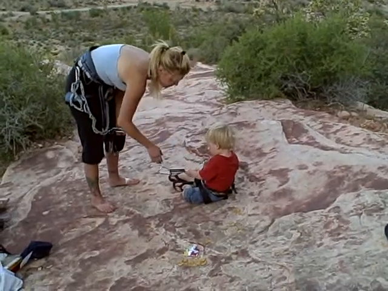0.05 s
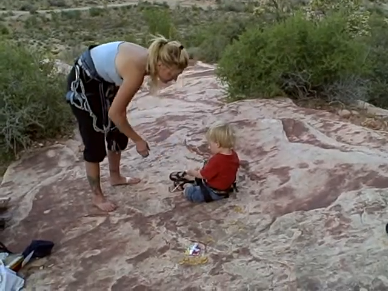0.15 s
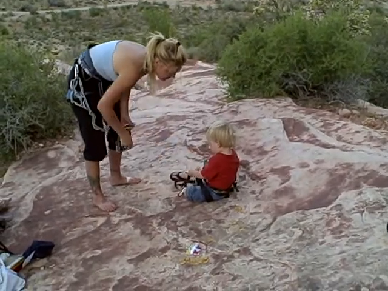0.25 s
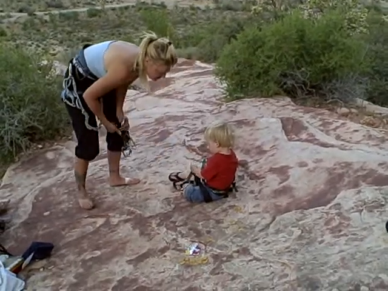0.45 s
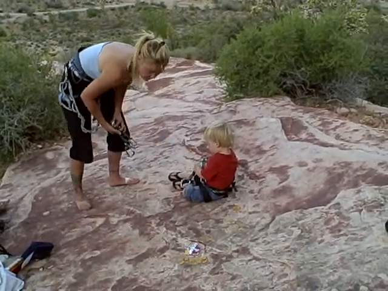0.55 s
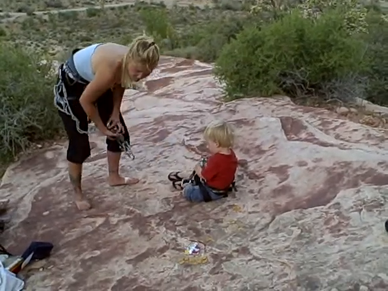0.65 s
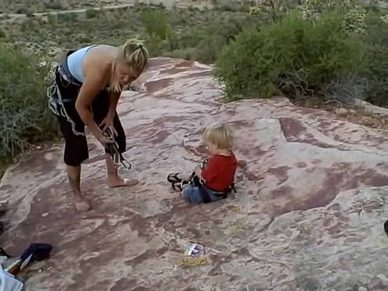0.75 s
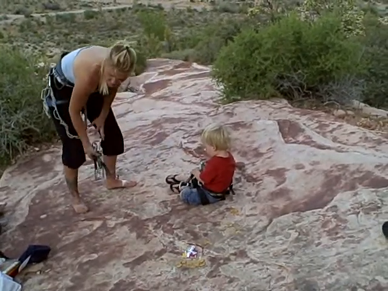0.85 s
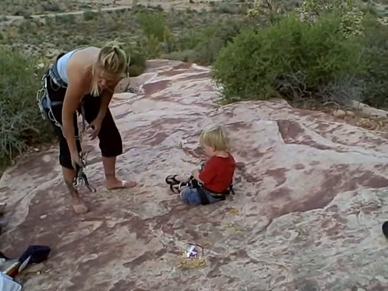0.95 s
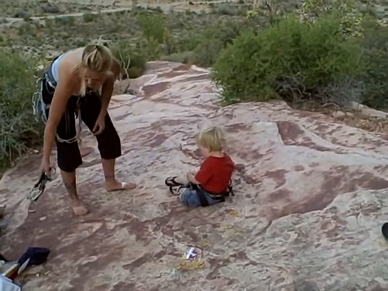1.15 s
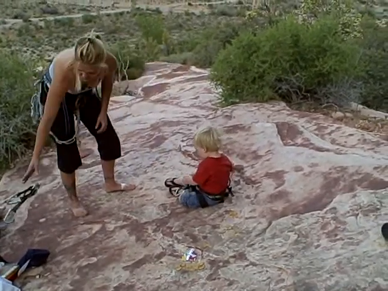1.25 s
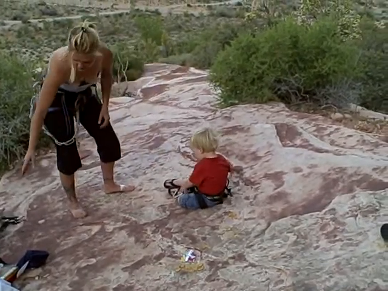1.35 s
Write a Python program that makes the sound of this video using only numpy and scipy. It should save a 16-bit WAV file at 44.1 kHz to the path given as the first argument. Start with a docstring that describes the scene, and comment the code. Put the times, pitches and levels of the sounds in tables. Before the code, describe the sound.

A carabiner snaps shut with a bright, dry click, followed after a pause by clusters of small metallic clinks and scrapes; outdoors, light wind, low hum and faint echo, a small microphone some metres away.

```python
"""Climbing carabiners handled on an open rock slab, a few metres from a small camera.
Throughout: light wind and hiss (shaped noise) and a low wavering hum (drifting sine).
After a first faint knock a sprung gate snaps shut: two modal blows plus decaying noise, damped as it seats.
Then the gathered pieces knock, rattle and slide: ticks, decaying modes cut short by the hand, grainy noise.
Rock and bushes return a faint echo of the gear: a decaying noise tail."""
import sys
import numpy as np
from scipy import signal
from scipy.fft import rfft, irfft
from scipy.io import wavfile
from scipy.ndimage import uniform_filter1d

SR = 44100
rng = np.random.default_rng(int(sys.argv[2]) if len(sys.argv) > 2 else 0)


def store_wav(level_fs):
    """Save 16-bit WAV to argv[1]."""
    pcm = np.round(np.clip(np.atleast_2d(level_fs), -1, 1) * 32767)
    wavfile.write(sys.argv[1], SR, pcm.T.astype(np.int16))


N = 61739  # samples
SNAP_S = 0.22163  # gate meets nose


def undb(db):
    """Decibels to amplitude gain."""
    return 10 ** (np.asarray(db) / 20)


def level(x, rms_db):
    """Scale to an rms level."""
    return x * undb(rms_db) / np.sqrt(np.mean(x ** 2))


def gains(points, size):
    """Gain per transform bin, dB interpolated over log frequency; points are f/Hz, level/dB."""
    f_hz, level_db = np.array(points, float).T
    bin_hz = np.arange(size // 2 + 1) * SR / size
    return undb(np.interp(np.log(bin_hz + 1), np.log(f_hz), level_db))


def colour(x, points, size=1024):
    """Minimum-phase filter via the folded cepstrum; its impulse response has unit peak."""
    cepstrum = irfft(np.log(gains(points, size)))
    cepstrum[1:size // 2] *= 2
    cepstrum[size // 2 + 1:] = 0
    response = irfft(np.exp(rfft(cepstrum)))
    return signal.fftconvolve(x, response / np.abs(response).max())[:N]


def noise(points):
    """Steady Gaussian noise shaped to a spectrum."""
    return irfft(rfft(rng.standard_normal(N)) * gains(points, N), N)


def walk(rate_hz):
    """Slow random drift, spread near 1: held random values, smoothed."""
    hold = int(SR / rate_hz)
    steps = np.repeat(rng.standard_normal(N // hold + 1), hold)
    return uniform_filter1d(steps, hold)[:N]


def since(start_s):
    """Seconds since a moment, zero before it."""
    return np.maximum(np.arange(N) - int(start_s * SR), 0) / SR


def ring(start_s, modes, length=1):
    """Struck body: decaying sine modes (f/Hz, level/dB, t60/s); length scales every t60."""
    contact_s = 0.00024  # time for a blow to build up
    t = np.maximum(np.arange(N) / SR - start_s, 0)
    attack = 1 - np.exp(-np.minimum(t / contact_s, 10) ** 2)
    total = 0
    for f_hz, level_db, t60_s in modes:
        decay = np.exp(-np.minimum(np.log(1000) * t / (t60_s * length), 20))
        total = total + undb(level_db) * np.sin(2 * np.pi * f_hz * t) * decay
    return attack * total


def background():
    """Open air: gusting wind noise, frequency-wavering hum, even hiss."""
    # wind spectrum: f/Hz, level/dB
    wind_spectrum = [(12, -33), (20, -0.5), (82, -7.5), (124, -9), (545, -22), (665, -24), (955, -26),
                     (1050, -27.5), (1500, -35.5), (1950, -57), (3300, -120)]
    # hiss spectrum: f/Hz, level/dB
    hiss_spectrum = [(1000, -10), (1600, -2.5), (3000, -5), (4600, -5.5), (5600, -6.5), (6500, -2.5),
                     (7650, -1), (8000, -8.5), (8700, -19.5)]
    wind_db, hum_db, hiss_db = -61, -65.5, -70  # rms
    gust_db, gust_rate_hz = 1.5, 6.5
    hum_hz, waver, waver_rate_hz = 71.7, 0.072, 21  # waver: relative frequency drift

    wind = noise(wind_spectrum) * undb(gust_db * walk(gust_rate_hz))
    drifting_hz = hum_hz * (1 + waver * walk(waver_rate_hz))
    hum = np.sin(2 * np.pi * np.cumsum(drifting_hz) / SR)
    return level(wind, wind_db) + level(hum, hum_db) + level(noise(hiss_spectrum), hiss_db)


def echo(x):
    """Scatter from rock and bushes: convolution with a delayed, decaying unit-energy noise tail."""
    echo_db, t60_s, delay_s = -24.5, 0.21, 0.01
    t = since(delay_s)
    tail = (t > 0) * rng.standard_normal(N) * np.exp(-np.log(1000) * t / t60_s)
    tail = tail / np.sqrt(np.sum(tail ** 2))
    return undb(echo_db) * signal.fftconvolve(x, tail)[:N]


def slides():
    """Metal rubbing on metal: grainy noise under half-sine swells."""
    # pieces sliding over each other: start t/s, length/s, peak level/dB
    strokes = [(0.29, 0.059, -69), (0.343, 0.064, -68), (0.696, 0.094, -64.5), (0.79, 0.089, -60),
               (1.357, 0.03, -61.5)]
    # rubbing spectrum: f/Hz, level/dB
    rub_spectrum = [(2000, -23), (4000, -10), (5400, -4.5), (6400, -1), (7200, -4.5), (8100, -11.5),
                    (8700, -27)]
    grain_db, grain_rate_hz = 4, 400

    swell = 0
    for start_s, length_s, peak_db in strokes:
        progress = np.minimum(since(start_s) / length_s, 1)
        swell = swell + undb(peak_db) * np.sin(np.pi * progress)
    rub = noise(rub_spectrum) * undb(grain_db * walk(grain_rate_hz))
    return swell * level(rub, 0)


def frame():
    """The snapped carabiner's frame rings on after its gate has seated."""
    # frame modes: f/Hz, level/dB, t60/s
    frame_modes = [(5830, -51, .3), (5900, -55, .28)]
    return ring(SNAP_S, frame_modes)


def gate():
    """Sprung gate hits the nose, rebounds once, chatters and rings until seating damps it."""
    # gate modes: f/Hz, level re snap/dB, t60/s
    gate_modes = [(317, -22.5, 0.061), (763, -21.5, 0.018), (1020, -24, .018), (2170, -27.5, .026),
                  (4100, -25.5, .03), (5000, -12, 0.0065), (5855, -11.5, .04), (5905, 1, 0.031),
                  (6150, 5, 0.011), (6530, -9, 0.017), (6874, -17.5, 0.045), (7470, -20, 0.058)]
    # chatter spectrum: f/Hz, level/dB
    chatter_spectrum = [(80, -13.5), (280, -1.5), (600, -6), (1500, -6.5), (3200, -5), (4300, -1.5),
                        (6300, 0), (7300, -1.5), (8000, -12), (8700, -17.5)]
    snap_db, rebound_s, rebound_db = -13.5, .00451, -13  # rebound: delay and level re snap
    chatter_db, chatter_decay_s = -26.5, 0.0062  # rms before decay; time constant
    seat_s, seat_damp_s = .0085, .002  # delay after snap; time constant

    t = since(SNAP_S)
    rebound = undb(rebound_db) * ring(SNAP_S + rebound_s, gate_modes)
    blows = ring(SNAP_S, gate_modes) + rebound
    chatter = level(noise(chatter_spectrum), chatter_db) * (t > 0) * np.exp(-t / chatter_decay_s)
    seated = np.exp(-since(SNAP_S + seat_s) / seat_damp_s)
    return (undb(snap_db) * blows + chatter) * seated


def contact(start_s, scatter_s):
    """Unit pulse, then an exponentially dying spray of tiny contacts."""
    scatter_db = 10  # spray energy re first pulse
    t = since(start_s)
    spray = (t > 0) * np.exp(-t / scatter_s) * rng.standard_normal(N)
    spray = spray / np.sqrt(np.sum(spray ** 2))
    pulse = np.arange(N) == int(start_s * SR)
    return undb(scatter_db) * spray + pulse


def favour(modes, favoured_hz, boost_db):
    """Striking point: boosts the mode nearest one frequency."""
    nearest = np.argmin([abs(mode[0] - favoured_hz) for mode in modes])
    return [(f_hz, level_db + boost_db * (k == nearest), t60_s)
            for k, (f_hz, level_db, t60_s) in enumerate(modes)]


def clinks():
    """Metal on metal: each knock gives a dry tick and rings the piece struck; grip scales its t60."""
    # modes by piece: f/Hz, level re ring/dB, t60/s
    gear_modes = { "loose": [(5235, -9.5, .2), (5510, -4, 0.09), (5935, -7.5, 0.19), (6220, -13, 0.059),
                  (6900, -31, .15), (8000, -15, 0.089)], "held": [(1520, -12, 0.032), (3200, -15.5, 0.098),
                  (5235, -36, .08), (5503, -10.5, 0.2), (5940, -12.5, 0.046), (6018, -2, 0.14),
                  (6352, -17.5, .07), (8020, -18, 0.036)], "swung": [(5235, -24, 0.068), (5505, -12, 0.12),
                  (5940, -6.5, 0.041), (6020, 0, .13), (6352, -17, .06), (7150, -21, 0.036)],
                  "small": [(3980, -9, 0.065), (4230, -11.5, 0.059), (5200, -12, 0.062),
                  (5860, -25.5, 0.027), (6610, -1.5, 0.058), (6600, -12.5, 0.064), (7620, -11.5, 0.07),
                  (7300, -9.5, .05), (7900, -21, .06), (8450, -16, .04)], "buckle": [(2500, -8.5, .1),
                  (3135, -14.5, .1), (4244, -2, .07), (5110, -4, .1), (5410, -1.5, 0.13), (5790, -4, .1),
                  (6530, 3.5, .06), (7560, -1, .03), (8230, -5.5, 0.028)], }
    # knocks: t/s, tick level re tick_db/dB, scatter time constant/s, ring level/dB, t60 factor,
    # favoured mode f/Hz, its boost/dB, piece struck
    knocks = [ (0.1624, -50.5, .003, -66.5, 0.62, 5410, 6.5, "buckle"),
              (0.255, -35, .005, -57.5, 0.47, 2500, 12.5, "buckle"),
              (0.2998, -40.5, 0.0058, -65.5, 0.81, 5790, 20, "buckle"),
              (0.3504, -44, .006, -66, 0.95, 3135, 17.5, "buckle"),
              (0.5598, -26.5, 0.0038, -42, .15, 6352, 8, "held"),
              (0.6312, -25.5, 0.009, -43.5, 1.42, 5510, 4, "loose"),
              (0.6840, -29, 0.005, -50, 0.54, 5235, 0, "loose"),
              (0.7100, -41, 0.0016, -58, 0.74, 6610, -2, "small"),
              (0.7238, -40, 0.00089, -52.5, 0.41, 6610, -1, "small"),
              (0.7413, -25.5, 0.0025, -42.5, 0.65, 6610, 12, "small"),
              (0.7438, -24.5, 0.0041, -52, .5, 6610, 3, "small"),
              (0.7523, -25, 0.0034, -49.5, 0.89, 4230, 15, "small"),
              (0.7603, -32, 0.0044, -48, 0.49, 3980, 6.5, "small"),
              (0.8014, -39, .01, -52, 1.3, 7900, 12, "small"),
              (0.8215, -36.5, 0.0049, -53.5, 1.4, 7900, 14, "small"),
              (0.8626, -17, 0.0038, -40.5, 1.1, 8020, 14, "held"),
              (0.9039, -21.5, 0.003, -42, 0.93, 5503, 5.5, "held"),
              (1.0900, -22.5, 0.0098, -39, 0.56, 5940, 11, "swung"),
              (1.1192, -16, 0.0027, -41.5, 0.92, 6020, 5, "swung"),
              (1.1273, -30, 0.0033, -47, 0.77, 5505, 14, "swung"),
              (1.1324, -24, 0.018, -47.5, 0.77, 6020, 5.5, "swung"),
              (1.1391, -24, 0.0066, -44, 0.77, 6020, 5, "swung"),
              (1.1770, -34, 0.01, -60.5, 1.1, 3980, 7, "small"),
              (1.1928, -24.5, 0.0054, -39, 0.35, 7900, 16, "small"),
              (1.2084, -34, 0.0068, -57, 0.92, 5410, 2.5, "buckle"),
              (1.2316, -57, .003, -57.5, 0.93, 6018, 3.5, "held"),
              (1.2442, -36, 0.0074, -57.5, 0.87, 6530, 2, "buckle"),
              (1.3695, -31, .002, -56, 0.74, 5110, 9, "buckle"), ]
    # tick spectrum: f/Hz, level/dB
    tick_spectrum = [(60, -28.5), (250, -13), (600, -19), (1300, -16), (2200, -14.5), (3300, -15.5),
                     (4500, -11.5), (5300, -6.5), (6000, 5.5), (6700, -2), (7400, -3), (8000, -27),
                     (8700, -22)]
    tick_db = -14

    ticks = rings = 0
    for start_s, hit_db, scatter_s, ring_db, length, favoured_hz, boost_db, piece in knocks:
        ticks = ticks + undb(hit_db) * contact(start_s, scatter_s)
        modes = favour(gear_modes[piece], favoured_hz, boost_db)
        rings = rings + undb(ring_db) * ring(start_s, modes, length)
    return undb(tick_db) * colour(ticks, tick_spectrum) + rings


def scene():
    """Gear, its echo and the open air, one channel."""
    gear = gate() + frame() + clinks() + slides()
    return (gear + echo(gear) + background())[None]


def record(dry):
    """The camera cuts the top steeply: elliptic low-pass."""
    top_hz, ripple_db, stop_db = 8550, .2, 70
    lowpass = signal.ellip(8, ripple_db, stop_db, top_hz, fs=SR, output="sos")
    return signal.sosfilt(lowpass, dry)


dry = scene()
out = record(dry)
store_wav(out)
```